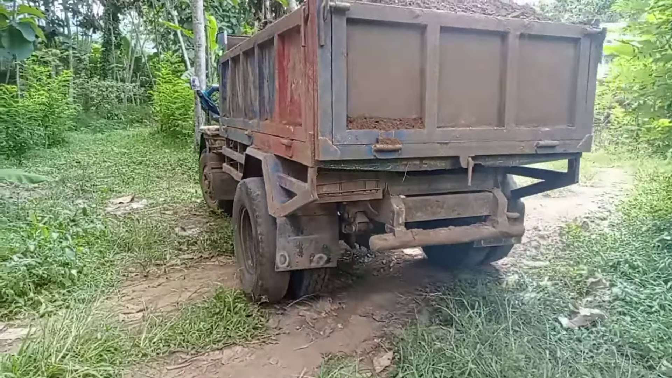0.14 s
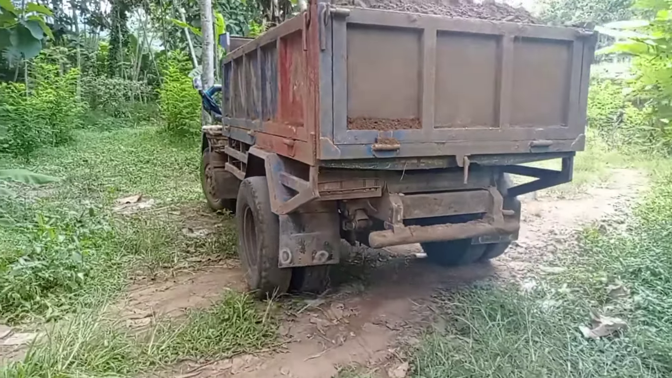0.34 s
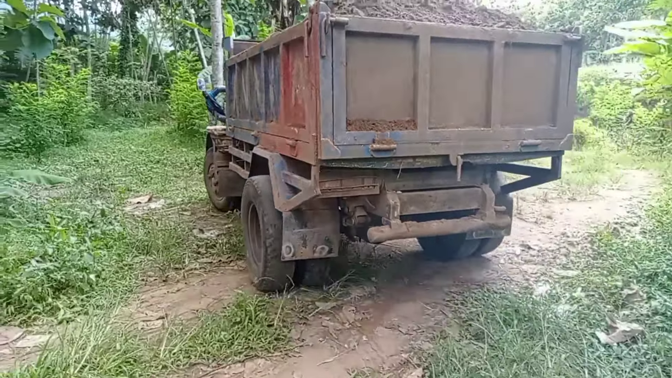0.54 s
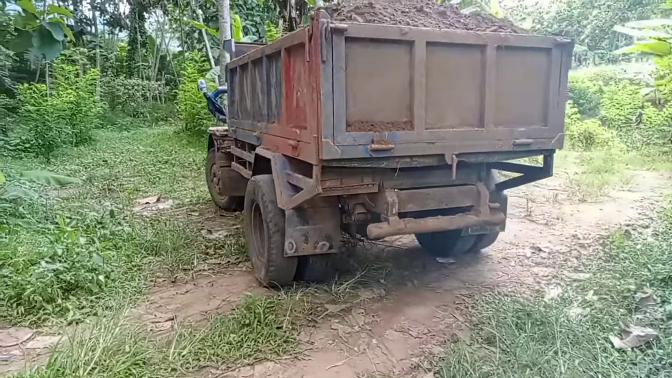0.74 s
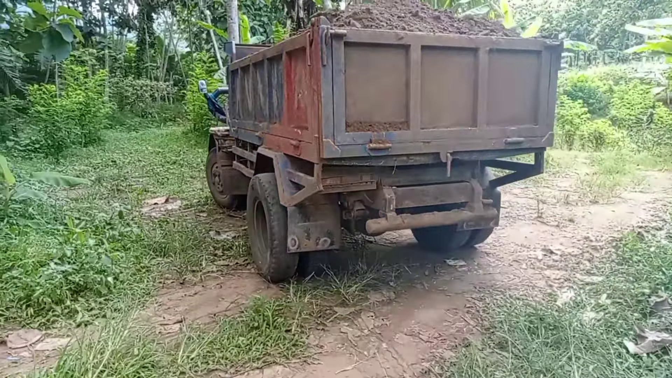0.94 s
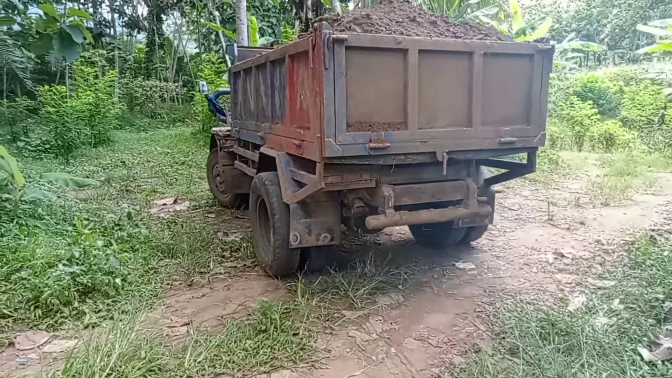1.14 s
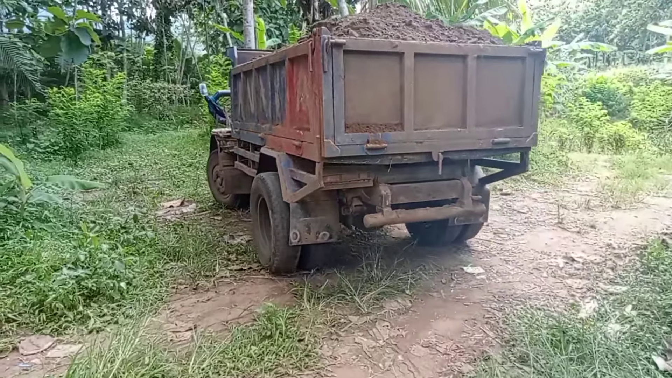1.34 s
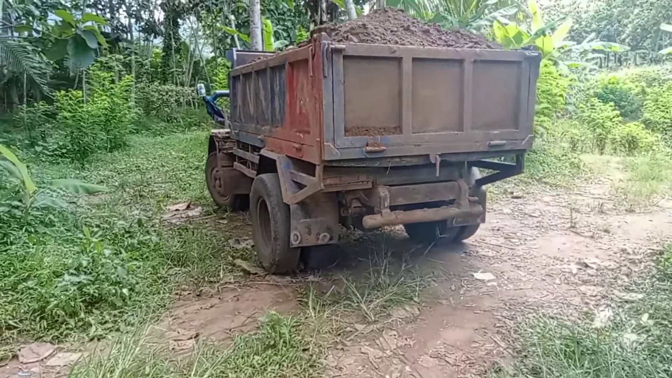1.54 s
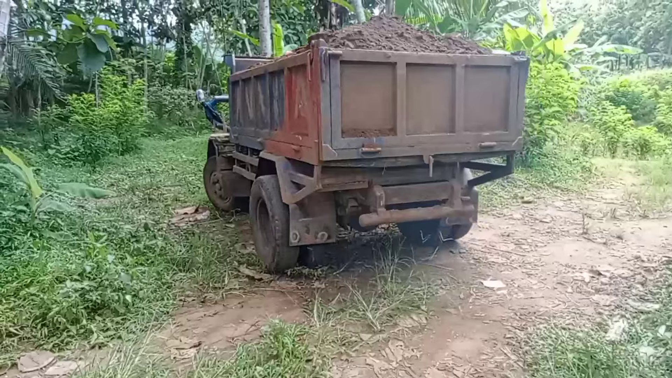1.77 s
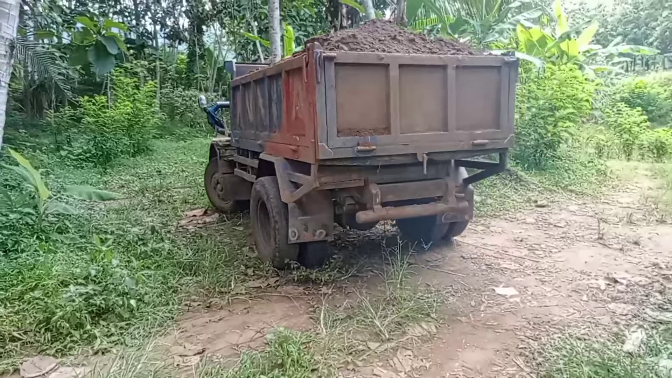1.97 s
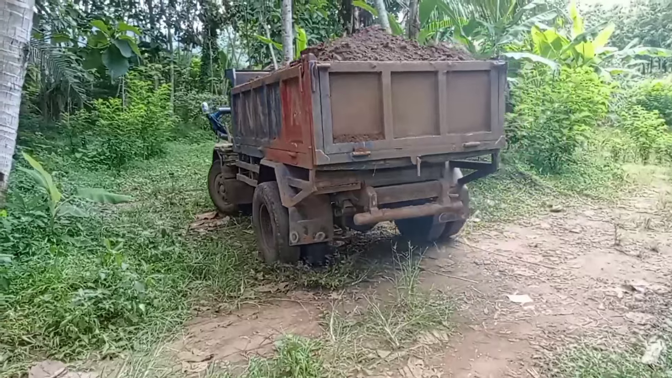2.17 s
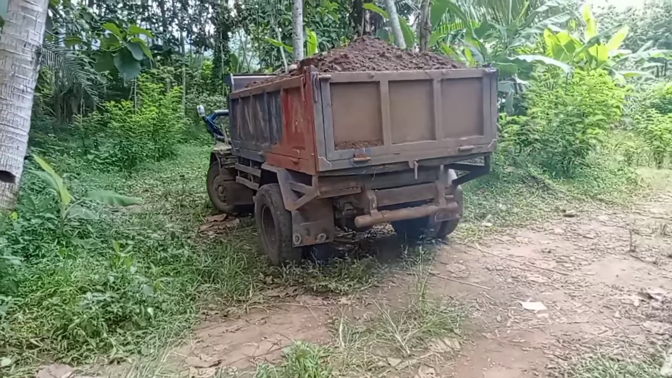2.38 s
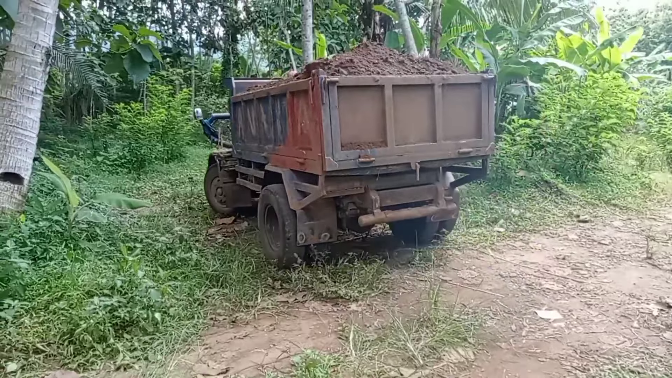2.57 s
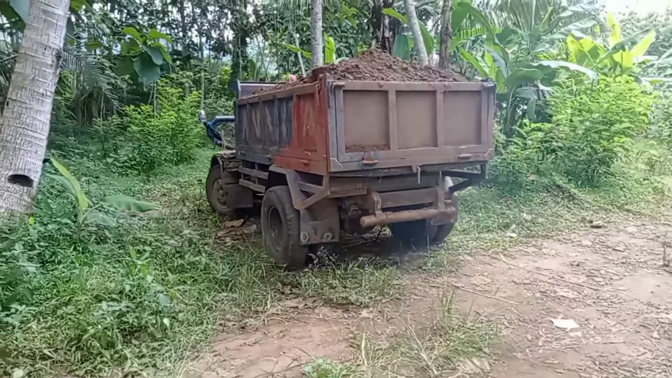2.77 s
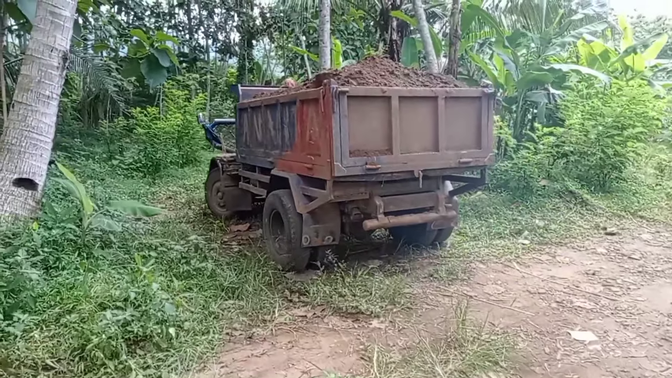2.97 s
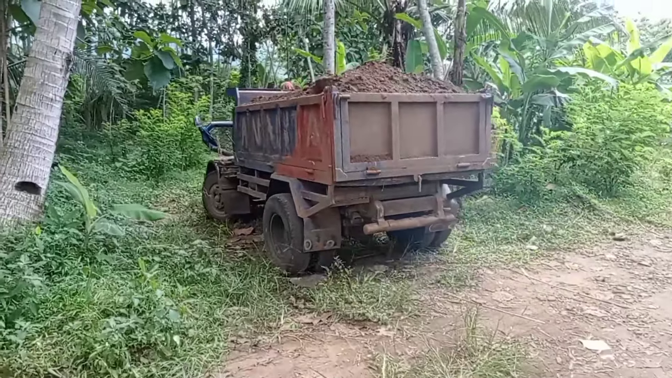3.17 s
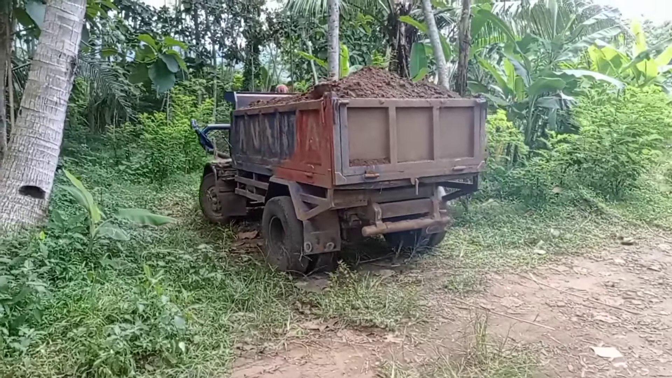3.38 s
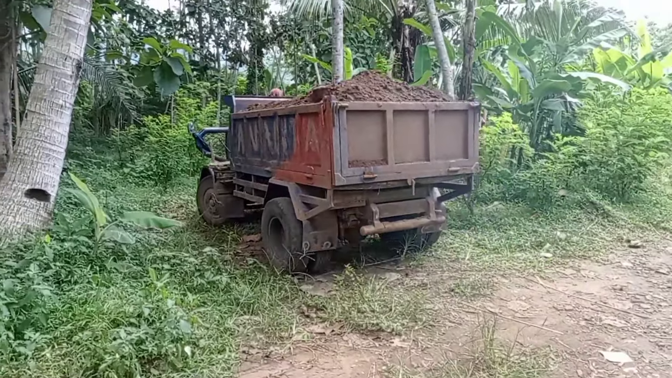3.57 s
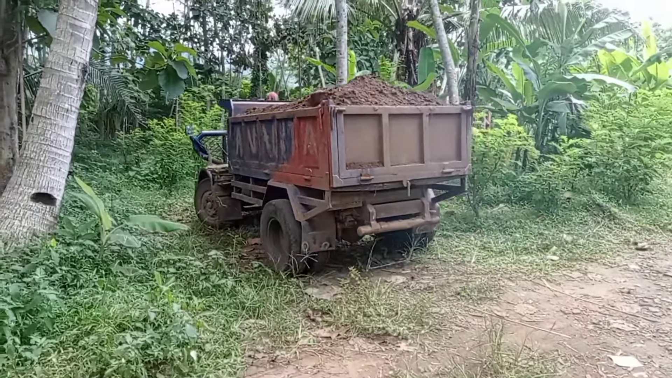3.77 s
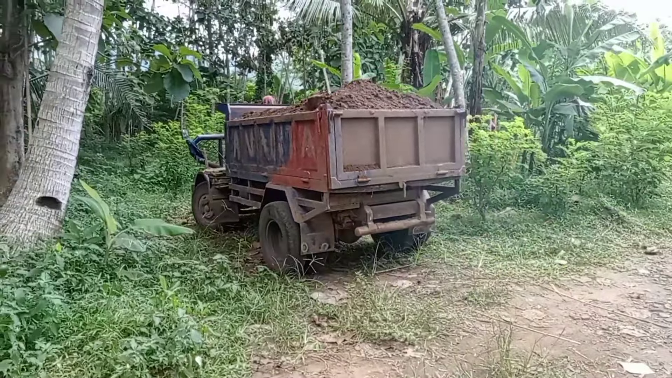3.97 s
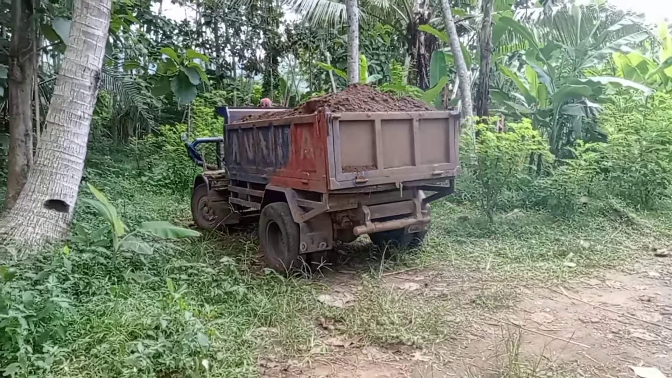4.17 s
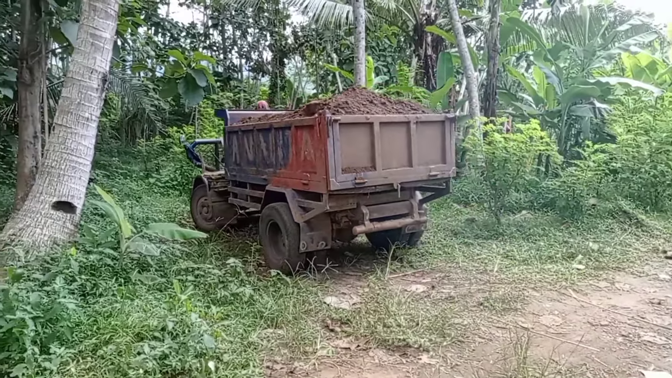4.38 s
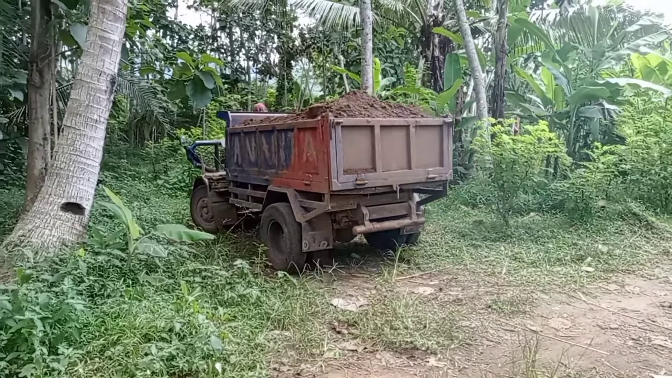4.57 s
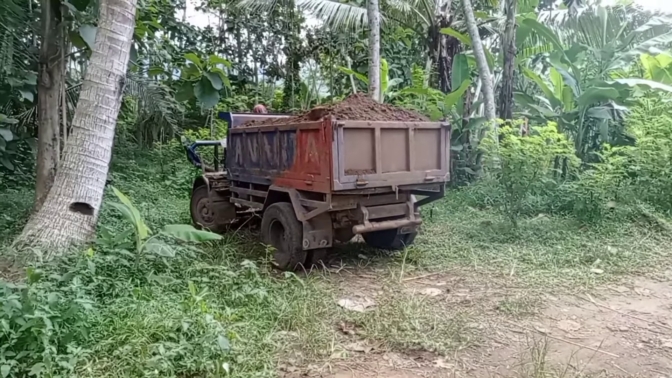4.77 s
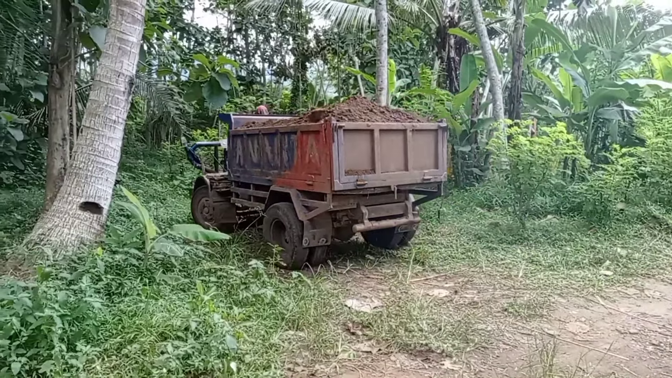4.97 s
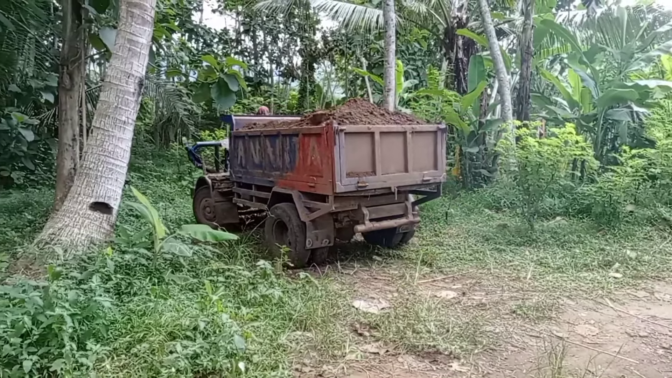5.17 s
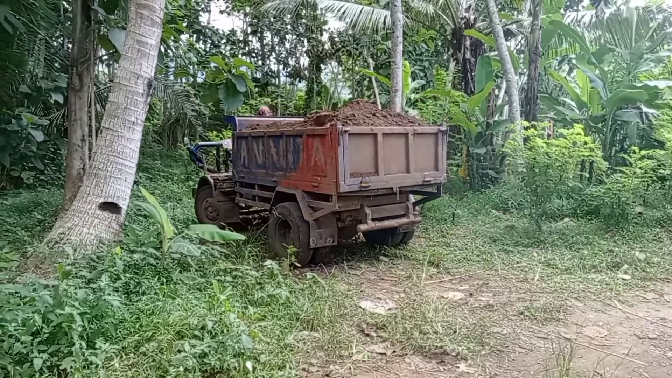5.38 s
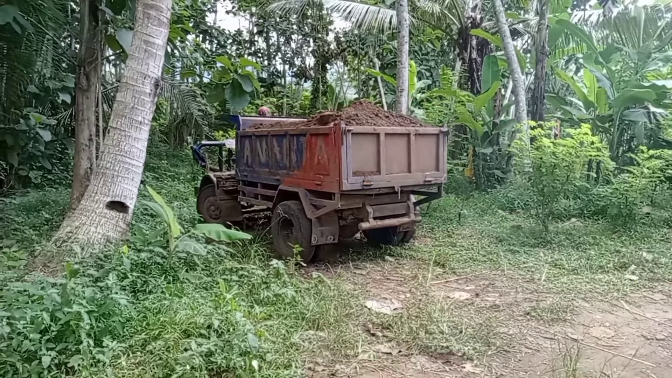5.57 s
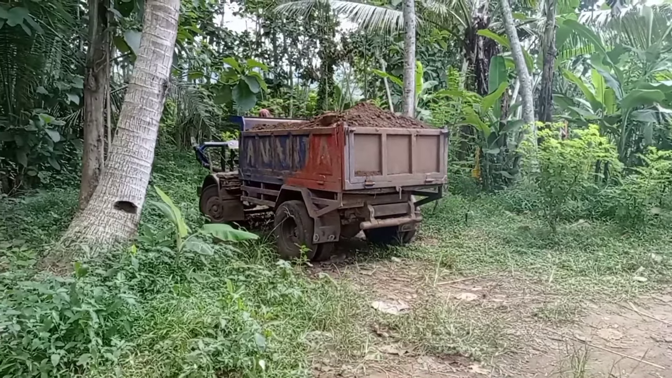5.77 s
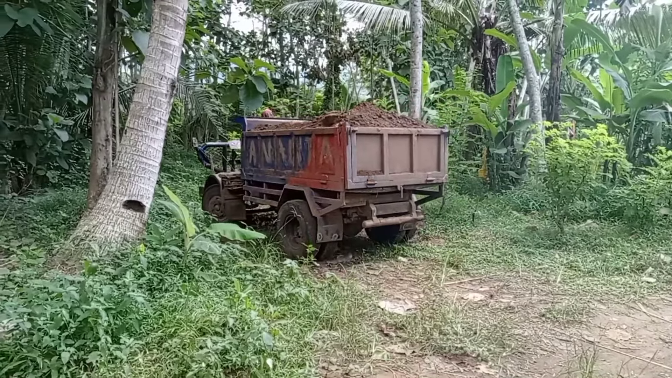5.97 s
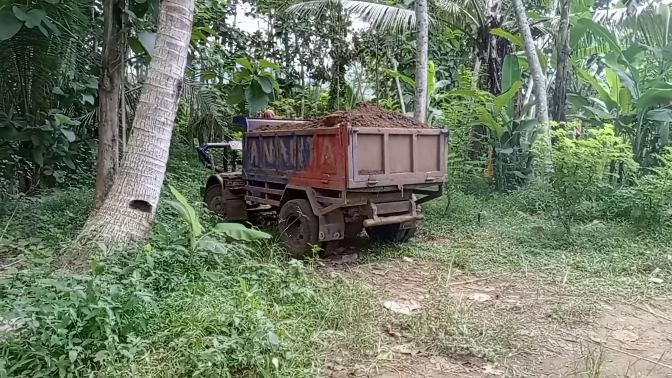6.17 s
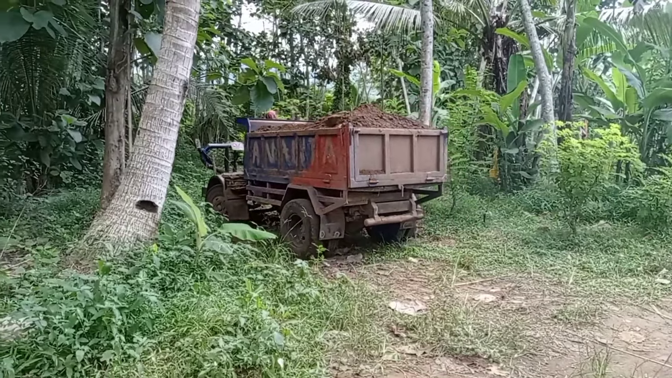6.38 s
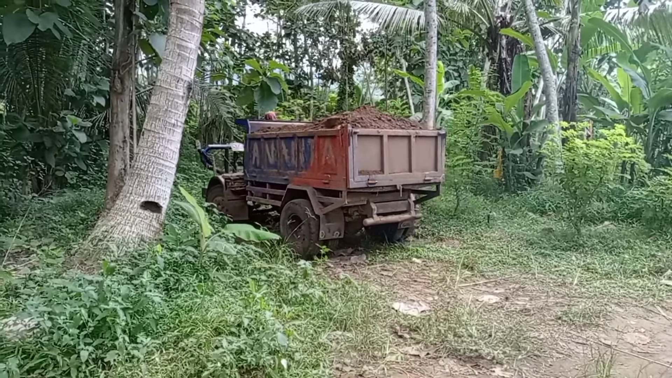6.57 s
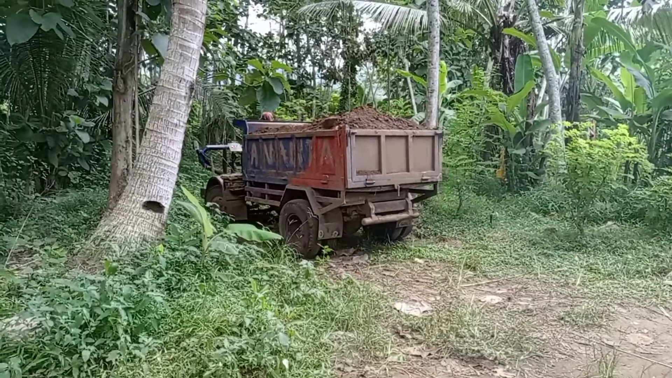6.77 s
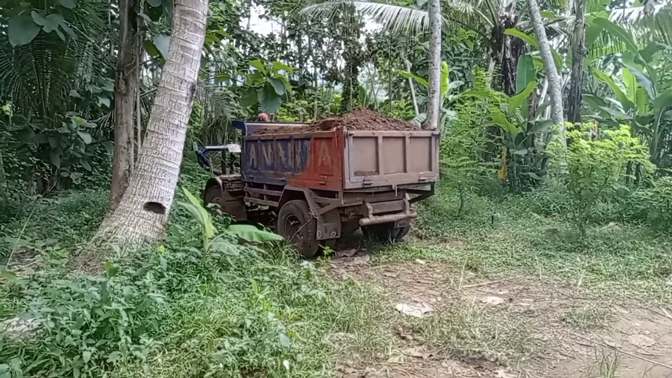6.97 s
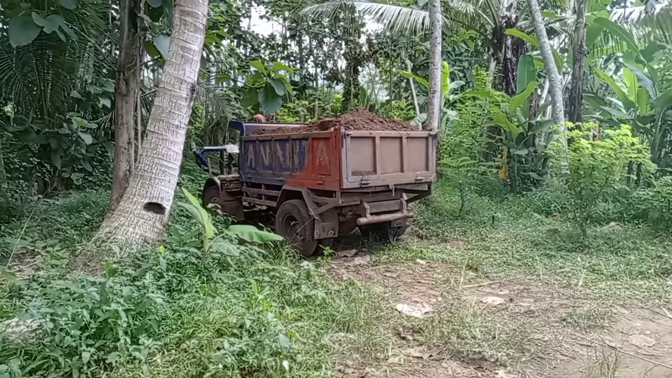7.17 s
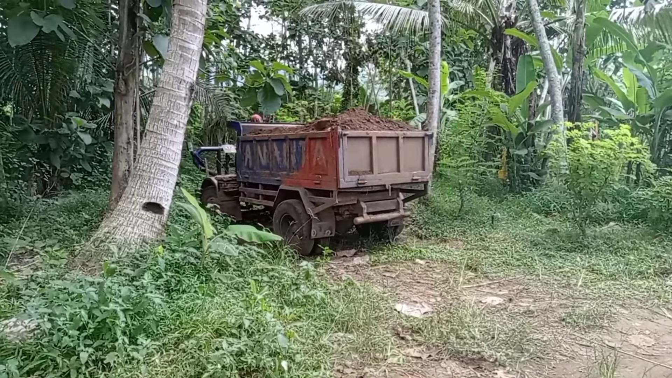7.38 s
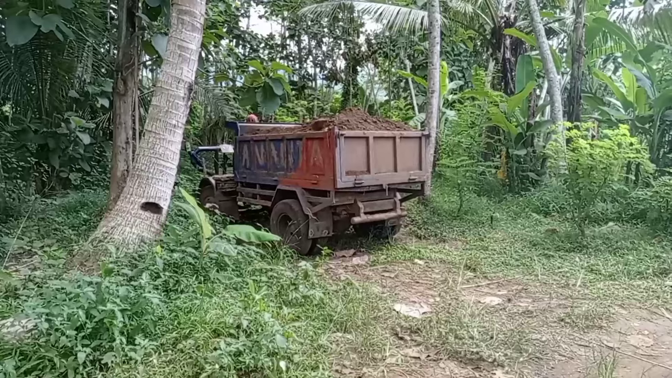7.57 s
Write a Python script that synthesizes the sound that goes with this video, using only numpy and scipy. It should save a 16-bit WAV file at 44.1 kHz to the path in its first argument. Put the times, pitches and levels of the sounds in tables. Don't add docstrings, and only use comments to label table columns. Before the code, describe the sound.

Close at first, a small diesel barks and thumps rapidly, each firing followed by a hollow puff and a burst of steel rattle. A bird calls early, low wind buffets the microphone, and a cluster of hard ignition cracks arrives after two seconds. Then the laden truck labours away along the track, pulses spreading apart and sinking in level, while leafy hiss, thin trills and a few closing chirps remain faint.

```python
import sys
import numpy as np
from scipy import signal
from scipy.io import wavfile

SR = 44100
rng = np.random.default_rng(int(sys.argv[2]) if len(sys.argv) > 2 else 0)


def volts_from_db(level):
    exponent = np.asarray(level, float) / 20
    return 10 ** exponent


def log_audio(samples):
    frames = np.atleast_2d(samples).T
    limited = np.clip(frames, -1, 1)
    pcm = np.round(limited * 32767).astype(np.int16)
    wavfile.write(sys.argv[1], SR, pcm)


N = 336924

# (time [s], firing rate [1/s])
ENGINE_SPEED = [(0.0, 14.176), (0.79, 14.566), (1.19, 14.518), (1.51, 14.324), (1.92, 13.366),
                (2.21, 13.153), (2.27, 13.46), (2.46, 13.982), (3.16, 14.387), (3.62, 13.753),
                (4.43, 11.922), (5.6, 10.543), (6.5, 9.366), (7.44, 8.272), (7.64, 8.002)]
# (time [s], thump level [dB], bark over thump [dB],
# after-puff over thump [dB], thump frequency [Hz])
EXHAUST_EFFORT = [(0, -4.5, 2, -12, 99.4), (.22, -4.5, 3, -11, 102.5), (.45, -5, 5, -7.5, 106.8),
                  (1.03, -4, 2, -15, 108.3), (1.15, -6, 1, -16, 110), (1.7, -5, 1.5, -11, 107.4),
                  (2.03, -9, -4.5, -6, 108), (2.16, -6, 1, -8, 96), (2.58, -5, 0, -10.5, 107),
                  (2.63, -4.5, -2, -9, 109), (2.94, -5, -6, -8, 108.4), (2.98, -6, -2.5, -5.5, 109.7),
                  (3.36, -6.5, -5, -7.5, 111), (3.4, -6.5, -12, -3.5, 113), (3.95, -9, -15, -7, 107.4),
                  (4.6, -12.5, -9, -2.5, 97.5), (6.1, -16, -10.5, -4, 87.8), (7.64, -20, -2.5, -8, 81.5)]


def rms_one(x):
    return x / np.sqrt(np.mean(x ** 2) + 1e-20)


def in_time(rows, s):
    at, *columns = np.transpose(rows)
    return [np.interp(s, at, c) for c in columns]


def drift(rate):
    r = np.exp(-80 * np.pi * rate / SR)
    white = rng.standard_normal(N // 40 + 2002)
    slow = signal.lfilter([1], [1, -2 * r, r * r], white)[2000:]
    return np.interp(np.arange(N) / 40, np.arange(len(slow)), rms_one(slow))


def resonance(x, hz, width_hz):
    r = np.exp(-np.pi * width_hz / SR)
    poles = [1, -2 * r * np.cos(2 * np.pi * hz / SR), r * r]
    return signal.lfilter([(1 - r * r) / 2, 0, (r * r - 1) / 2], poles, x)


def band(x, low_hz, high_hz, order=2):
    return signal.sosfilt(signal.butter(order, [low_hz, high_hz], "band", fs=SR, output="sos"), x)


def swell(at_s, db, rise_ms, decay_ms, hz=None):
    at_s, db, rise_ms, decay_ms = (np.broadcast_to(v, np.shape(at_s))[:, None]
                                   for v in (at_s, db, rise_ms, decay_ms))
    index = np.round(at_s * SR).astype(int) + np.arange(-SR // 12, SR // 6)
    ms = (index / SR - at_s) * 1000
    shape = volts_from_db(db) * np.exp(np.where(ms < 0, ms / rise_ms, -ms / decay_ms))
    if hz is not None:
        shape = shape * -np.sin(2 * np.pi * np.reshape(hz, (-1, 1)) * ms / 1000)
    inside = (index >= 0) & (index < N)
    return np.bincount(index[inside], shape[inside], N)


def turns():
    t = np.arange(-SR // 10, N) / SR
    count = np.cumsum(in_time(ENGINE_SPEED, t)[0]) / SR
    first_turn = .742
    return t, count - count[SR // 10] + first_turn


def firing_times():
    t, count = turns()
    return np.interp(np.arange(int(count[-1]) + 1), count, t)


def exhaust(silencer_db):
    # (time [s], thump change [dB], bark change [dB])
    weak_firings = [
        (.438, 0.5, -6.5),
        (1.905, -0.5, -9),
    ]
    s = firing_times()
    thump_db, bark_db, puff_db, thump_hz = in_time(EXHAUST_EFFORT, s)
    for at_s, thump_change_db, bark_change_db in weak_firings:
        nearest = np.argmin(abs(s - at_s))
        thump_db[nearest] += thump_change_db
        bark_db[nearest] += bark_change_db
    bark_db = thump_db + bark_db
    puff_db = thump_db + puff_db

    cycle_ms = 1000 / in_time(ENGINE_SPEED, s)[0]
    longer_ms = cycle_ms - 70
    short_cycle = cycle_ms < 77.5
    late_ms = 10.3 * (cycle_ms > 108)
    thump_s = s + (27.9 + late_ms) / 1000
    puff_s = s + (49.0 + (.24 * longer_ms - 6.2) * ~short_cycle) / 1000
    thump_rise_ms = 15.7 + 0.13 * np.maximum(longer_ms - 20, 0)
    thump_decay_ms = 6.1 + 0.21 * longer_ms
    puff_decay_ms = 2.65 + 0.53 * longer_ms

    bark = swell(s + .0053, bark_db, 4.0, 11.0, 115)
    thump = swell(thump_s, thump_db, thump_rise_ms, thump_decay_ms, thump_hz)
    push_db = thump_db - 10 - 0.6951 * np.maximum(longer_ms - 6, 0)
    thump += swell(thump_s + .001, push_db, 9.0, 5.1, 75)
    thump += swell(thump_s + .0012, thump_db - 14, 4.0, 5.2, 150)
    puff = swell(puff_s, puff_db, 4.0 + 3 * short_cycle, puff_decay_ms, 173)
    puff += swell(puff_s + .0012, puff_db - 10, 2.5, 6.0, 255)
    shell = silencer_shell(s, thump_db, bark_db, puff_db, puff_s, short_cycle, late_ms)

    turbulence = rms_one(band(rng.standard_normal(N), 34, 244.5, order=3))
    gas = turbulence * swell(s + 0.027, thump_db - 23.5, 42.0, 52.0)
    pulses = volts_from_db(1.54) * (bark + thump) + volts_from_db(1.5) * puff
    pulses += swell(s + 0.065, thump_db - 19, 40.0, 19.4, 135.7)
    for lag_s, echo_db in ((.031, -18), (.052, -13.5), (.078, -18)):
        pulses += volts_from_db(echo_db) * np.interp(np.arange(N) - lag_s * SR, np.arange(N), thump)
    pulses = signal.sosfiltfilt(signal.butter(3, 270, fs=SR, output="sos"), pulses)
    pulses = pulses + gas + volts_from_db(silencer_db + 3.5) * rms_one(shell)
    return signal.sosfiltfilt(signal.butter(4, 61, "high", fs=SR, output="sos"), pulses)


def silencer_shell(s, thump_db, bark_db, puff_db, puff_s, short_cycle, late_ms):
    uneven_db = rng.standard_normal((len(s), 2))
    decay_ms = 1000 * .1 / np.log(1000)
    ring_s = puff_s + np.where(short_cycle, -.003, .003)
    ring_db = np.where(short_cycle, .5 * (puff_db - thump_db + 9), .4 * late_ms - 2)
    shell = swell(ring_s, uneven_db[:, 0] + ring_db, 5.0, decay_ms, 333)
    shell += swell(s + .004, bark_db - thump_db - 6 + uneven_db[:, 1], 2.5, 4.5, 260)
    shell += swell(s + .021, uneven_db[:, 1] - 11, 2.5, 6.0, 300)
    shell += swell(puff_s, .5 * puff_db + uneven_db[:, 1], 3.0, 8.0, 372)
    return shell


def clatter(block_db, valve_db, hiss_db):
    # (frequency [Hz], spectral level [dB per Hz])
    clatter_spectrum = [(120, -31), (200, -62), (249, -22.5), (333, -10.5), (480, -6), (654, -6.5),
                        (925, -8.5), (1240, -9.5), (1490, -24), (2660, -20), (3690, -25.5), (4950, -58.5),
                        (7660, -32.5), (9190, -41.5), (15600, -46)]
    # (frequency [Hz], bandwidth [Hz], level [dB])
    steel_modes = [
        (747, 55, -16),
        (1018, 47, -10.5),
        (1262, 110, -13.5),
        (1888, 28, -18),
        (2599, 52, -10),
        (2342, 51, -14),
        (3580, 82, -12.5),
        (4120, 280, -22.5),
        (9030, 1100, 1.5),
        (13500, 700, -13),
    ]
    # (lag [ms], burst over the steady clatter [dB], decay [ms])
    contacts = [
        (0, 5, 4.0),
        (12.5, 8.5, 26),
        (47.5, -8, 4),
    ]
    s = firing_times()
    uneven_db = 2.2 * rng.standard_normal((len(s), len(contacts)))
    uneven_db[:, 0] += 0.94 * in_time(EXHAUST_EFFORT, s)[1]
    gate = 2.3 + .45 * np.arange(N) / SR
    for k, (ms, db, decay_ms) in enumerate(contacts):
        gate += swell(s + ms / 1000, db + uneven_db[:, k], 2.0, decay_ms)
    hardness = np.minimum(rng.exponential(1, (2, N)), 6)
    grains = rng.standard_normal((2, N)) * volts_from_db(1.58 * hardness)

    hz_points, db_points = np.transpose(clatter_spectrum)
    edges = 200 * 2 ** np.arange(0, 6.4, 1 / 3)
    splits_hz = [430, 1650, 5000]
    parts = np.zeros((4, N))
    for k, (low, high) in enumerate(zip(edges, edges[1:])):
        hz = np.sqrt(low * high)
        wander_db = (1.5 if hz < 700 else 2.3) * drift(14.8)
        level_db = np.interp(np.log(hz), np.log(hz_points), db_points) + wander_db
        depth = .6 if hz < 1700 else 1.0 if hz < 10000 else 1.7
        layer = np.searchsorted(splits_hz, hz)
        parts[layer] += volts_from_db(level_db) * band(grains[k % 2], low, high) * gate ** depth
    parts[2] = band(parts[2], 460, 4850, order=3)
    parts = np.array([rms_one(p) for p in parts])

    strikes = rng.random((len(s), len(steel_modes), 2))
    for k, (hz, width_hz, db) in enumerate(steel_modes):
        drive = grains[k % 2] * gate ** 1.6 / 2
        struck = np.clip((s + strikes[:, k, 0] * .018) * SR, 0, N - 1).astype(int)
        drive[struck] += volts_from_db(35.5 + 13.0 * strikes[:, k, 1])
        ringing = rms_one(resonance(resonance(drive, hz, width_hz), hz, 2 * width_hz))
        parts[np.searchsorted(splits_hz, hz)] += volts_from_db(db + 2.0 * drift(7)) * ringing
    levels = volts_from_db(np.array([.55 * (block_db + 33) - 47, block_db, valve_db, hiss_db]))
    layers = sum(level * rms_one(p) for level, p in zip(levels, parts))
    return valve_tick(s, uneven_db) + layers


def valve_tick(s, uneven_db):
    tick_db = -22.5 - 9 * s + 3.0 * uneven_db[:, 2]
    tick_hz = 1240 * (0.5 + 0.06 * uneven_db[:, 1] / 2)
    return swell(s + .056, tick_db, 0.65, 4.7, tick_hz)


def knocks():
    # (time [s], peak level [dB], top band level [dB], knock frequency [Hz])
    hard_knocks = [(0.0145, -25.5, -48, 2730), (0.0892, -20, -41, 3580), (0.1588, -21, -36.5, 2700),
                   (0.227, -26, -47, 2750), (0.368, -22.5, -48, 2570), (0.646, -32, -48, 2430),
                   (0.7128, -21.5, -49, 2660), (0.8658, -51, -65, 2660), (2.128, -21.5, -61, 3400),
                   (2.2052, -13, -33, 3700), (2.2801, -14, -32, 2710), (2.3544, -14, -28, 3690),
                   (2.427, -15, -37.5, 2860), (2.5, -23.5, -49, 2920), (2.64, -26, -52, 2550),
                   (4.834, -23.5, -40.5, 3020), (7.204, -34, -50, 3340), (7.4011, -32, -63, 3430)]
    s, peak_db, top_db, hz = np.transpose(hard_knocks)
    white = rng.standard_normal((3, N))

    def burst(db, fast_ms, slow_ms, tail_db):
        return swell(s + 0.003, db, 0.19, fast_ms) + swell(s + 0.00056, db + tail_db, 1.3, slow_ms)

    middle = rms_one(band(white[0], 2640, 3260)) * burst(peak_db - 13.5, 2.8, 40.5, -1)
    top_noise = rms_one(band(white[1], 8120, 10050)) + 0.66 * rms_one(band(white[1], 6200, 14700))
    top = top_noise * burst(top_db - 2.5, 1.8, 33.0, -7.5)
    crack = rms_one(band(white[2], 10000, 15500)) * swell(s + .002, top_db - 6, .15, 1.5)
    low = rms_one(band(white[2], 243, 1040)) * burst(peak_db - 15.0, 13.0, 46.0, 0.0)
    head_ring = swell(s + 0.001033, peak_db - 3.5, 0.2, 5.0, hz)
    bed = swell(np.array([4.85]), -30, 4.2, 27.0, 450)
    punch = swell(s + 0.00396, 1.46 * peak_db + 23.0, 2.2, 1.6, 154)
    return middle + top + crack + low + head_ring + bed + punch


def gear_whine(block_db):
    cycles = turns()[1][-N:]
    level = volts_from_db(block_db - 12.5 + 3 * drift(11))
    return level * np.sin(2 * np.pi * (51 * cycles + 0.06 * drift(30)))


def wildlife():
    # (start [s], end [s], level [dB])
    insect_trills = [
        (.1, .5, -63.5),
        (.88, 1.62, -64.5),
        (1.98, 2.2, -62.5),
        (2.5, 2.78, -67),
        (3.15, 3.54, -65),
        (4.0, 4.22, -69),
        (7.36, 7.64, -67),
    ]
    # (start [s], end [s], start frequency [Hz], end frequency [Hz], level [dB])
    bird_notes = [
        (.24, .453, 4100, 4140, -47.5),
        (5.9, 5.97, 5220, 5290, -67),
        (6.45, 6.6, 5330, 5300, -67),
        (7.345, 7.395, 4050, 4170, -52),
        (7.39, 7.45, 4450, 4720, -63),
        (7.474, 7.525, 4050, 4130, -53),
        (7.575, 7.65, 4150, 4120, -56),
    ]
    out, t = np.zeros(N), np.arange(N) / SR
    songs = [(start, end, 11530, 11530, db, 85) for start, end, db in insect_trills]
    songs += [(*note, 70) for note in bird_notes]
    for start, end, start_hz, end_hz, db, width_hz in songs:
        span = slice(round(start * SR), round(end * SR))
        hz = np.interp(t, [start, end], [start_hz, end_hz]) + 0.81 * width_hz * drift(149)
        tone = np.sin(2 * np.pi * np.cumsum(hz) / SR) * volts_from_db(db + 2.5 * drift(25))
        out[span] += tone[span] * signal.windows.tukey(len(t[span]), .45)
    return out


def leaves(hiss_db):
    return volts_from_db(hiss_db) * rms_one(band(rng.standard_normal(N), 3100, 16500))


def wind_rumble():
    # (time [s], level [dB])
    wind_gusts = [
        (.55, -42),
        (1.46, -29.5),
        (2.25, -41),
        (3.1, -47),
        (5.2, -55),
        (5.8, -54),
        (6.6, -55),
        (7.3, -75),
    ]
    t = np.arange(N) / SR
    wind = volts_from_db(-49 - 0.4 * t)
    for at_s, db in wind_gusts:
        wind += volts_from_db(db) * np.exp(-((t - at_s) / 0.091) ** 2)
    return wind * volts_from_db(2 * drift(7.5)) * rms_one(band(rng.standard_normal(N), 20, 68))


def scene():
    # (time [s], block level [dB])
    block_distance = [(0, -31), (.34, -32.5), (.79, -32), (1.2, -33.5), (1.96, -36), (2.19, -34),
                      (2.34, -31.5), (2.55, -35.5), (3.3, -36.5), (4.2, -38.5), (5.1, -41), (6.8, -43),
                      (7.64, -45.5)]
    block_db, = in_time(block_distance, np.arange(N) / SR)

    def layer_db(over_db, follows, wander_db):
        fading_db = block_db - block_db[0]
        return block_db[0] + over_db + follows * fading_db + wander_db * drift(1.8)

    silencer_db = layer_db(-5.5, 0.97, 0.74)
    valve_db = layer_db(-2, 1, 0.27)
    hiss_db = layer_db(-20, 1.05, 1)
    engine = exhaust(silencer_db) + clatter(block_db, valve_db, hiss_db) + knocks() + gear_whine(block_db)
    return (engine + wildlife() + leaves(hiss_db) + wind_rumble())[None]


def top_cut(x):
    return signal.sosfilt(signal.butter(12, 15560, fs=SR, output="sos"), x)


def record(dry):
    dry = signal.sosfilt(signal.cheby2(12, 60, 16600, fs=SR, output="sos"), dry)
    mix = 1.15 * np.tanh(dry / 1.314)
    return top_cut(mix)


dry = scene()
out = record(dry)
log_audio(out)
```